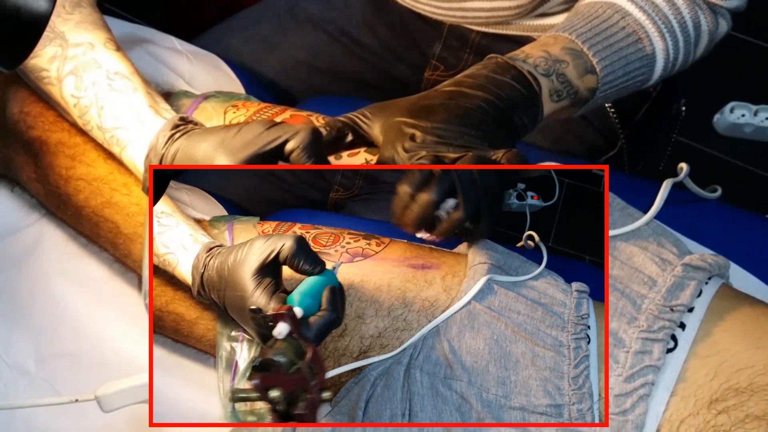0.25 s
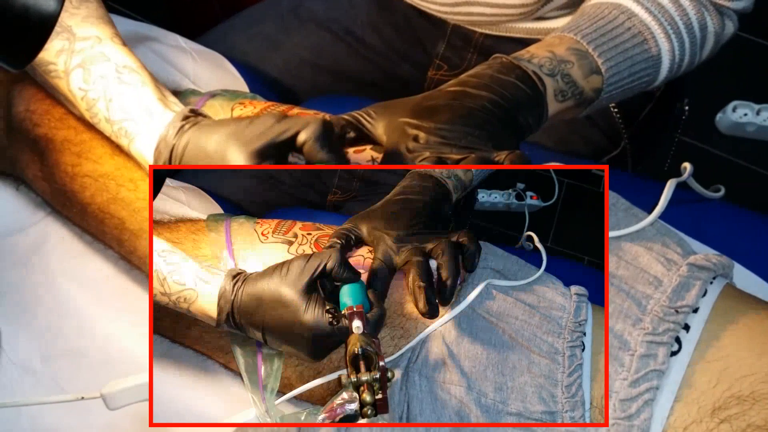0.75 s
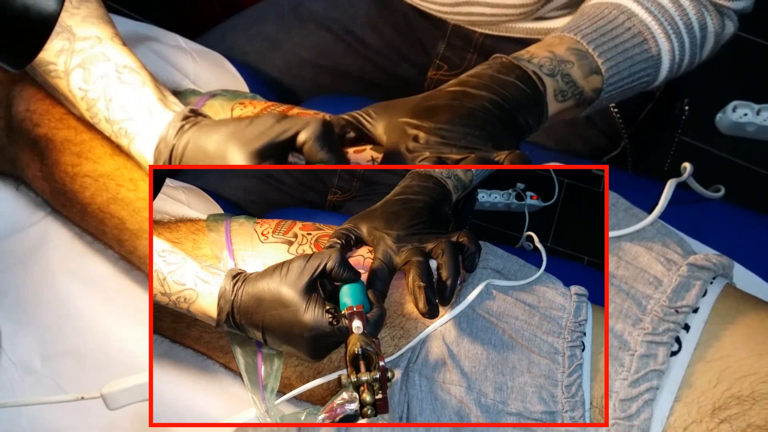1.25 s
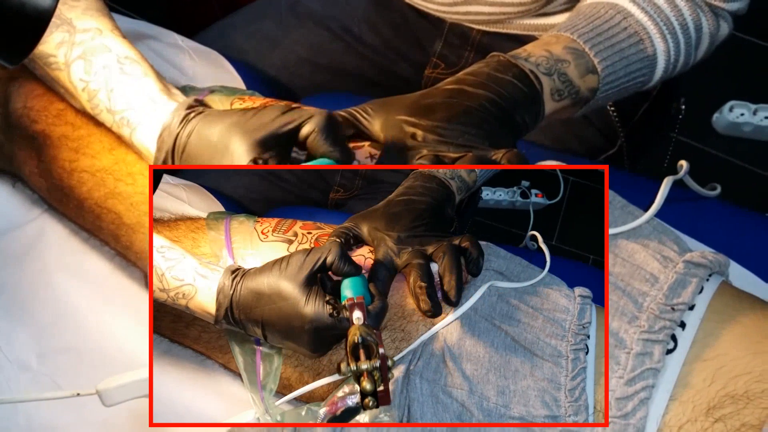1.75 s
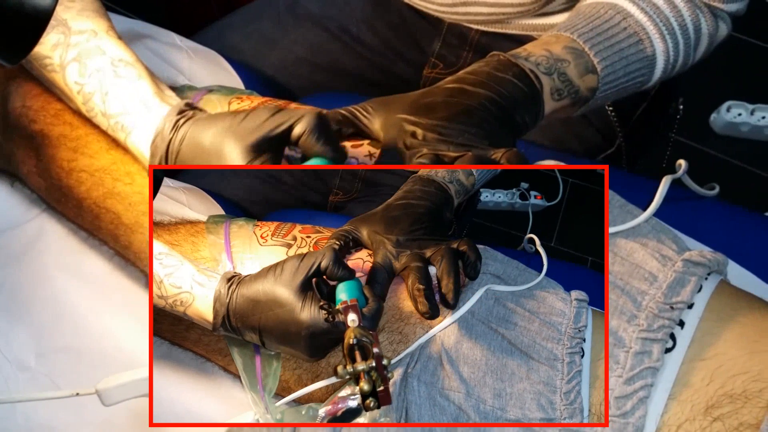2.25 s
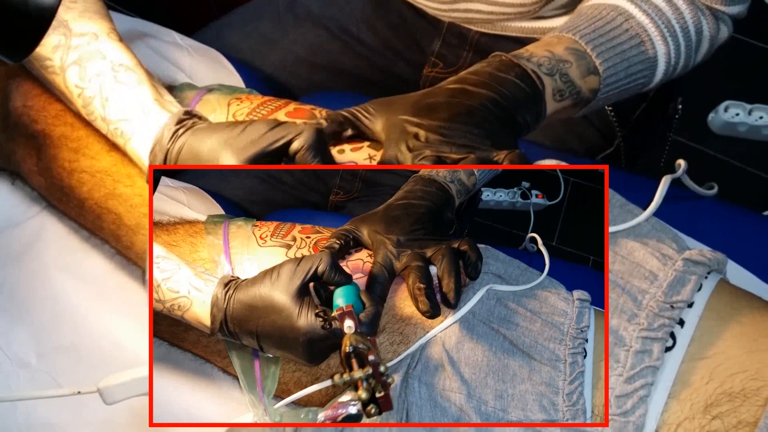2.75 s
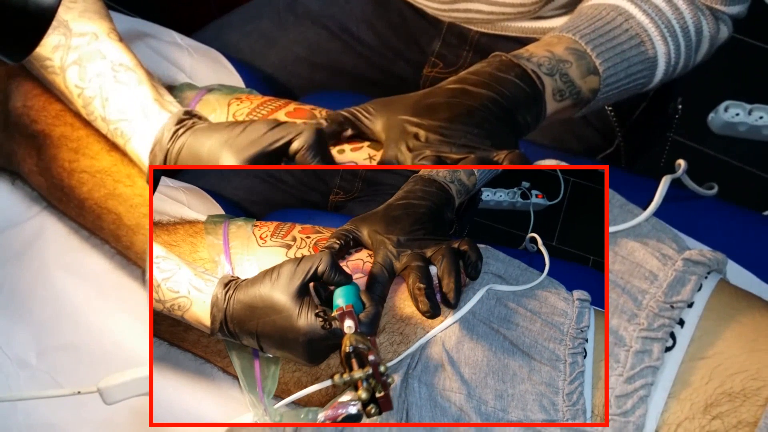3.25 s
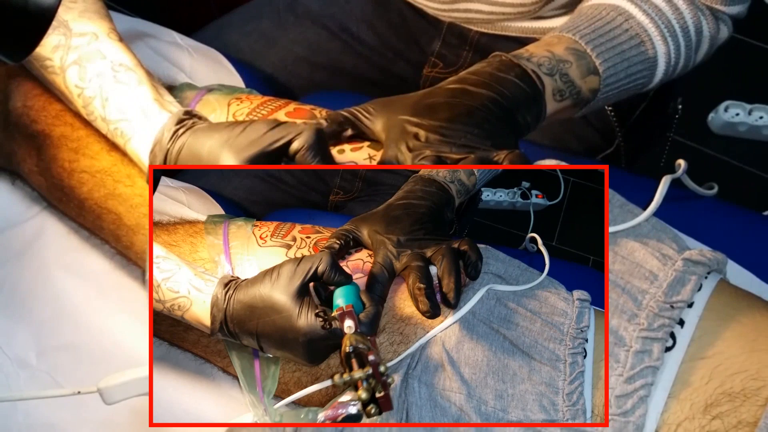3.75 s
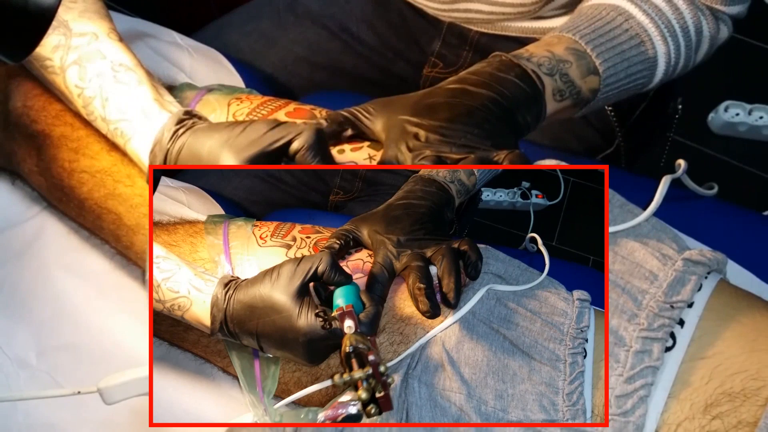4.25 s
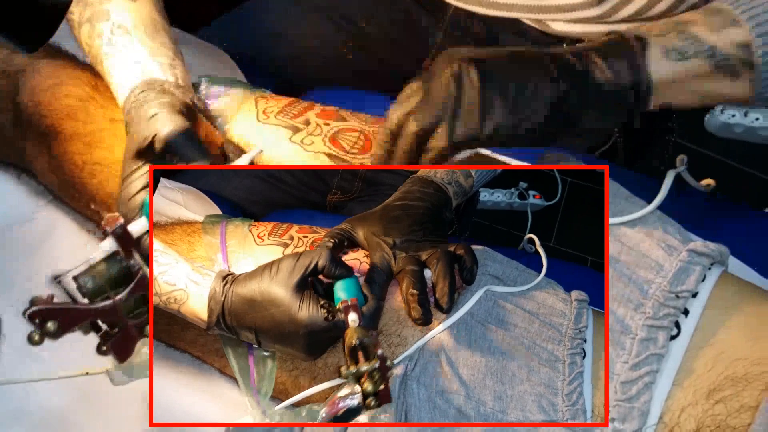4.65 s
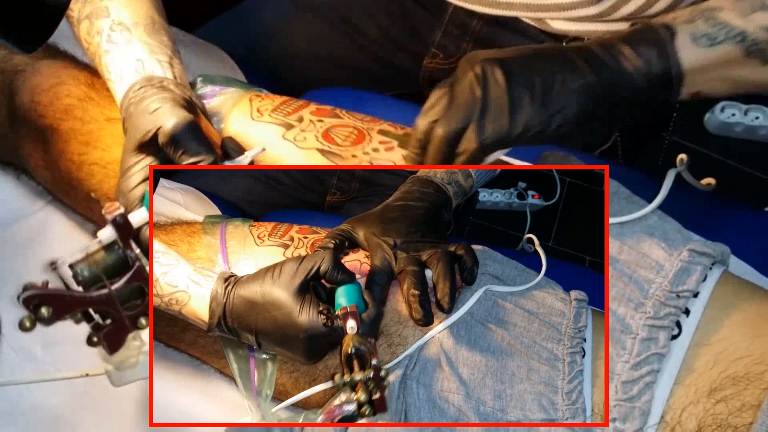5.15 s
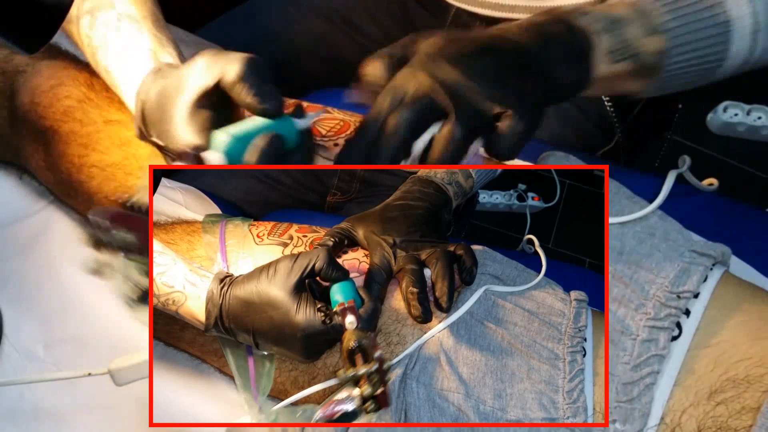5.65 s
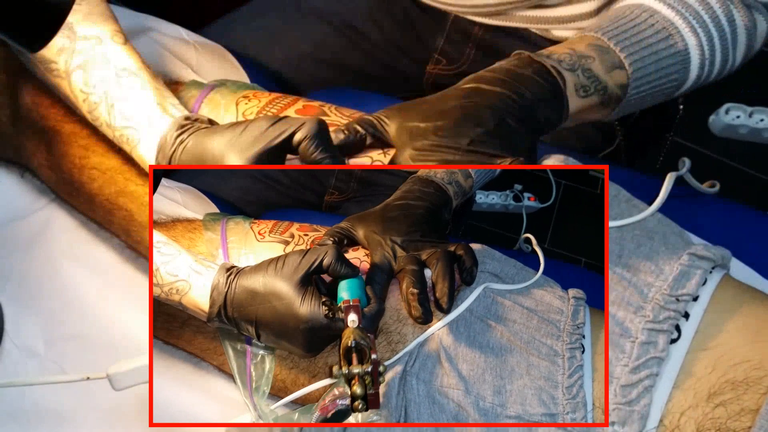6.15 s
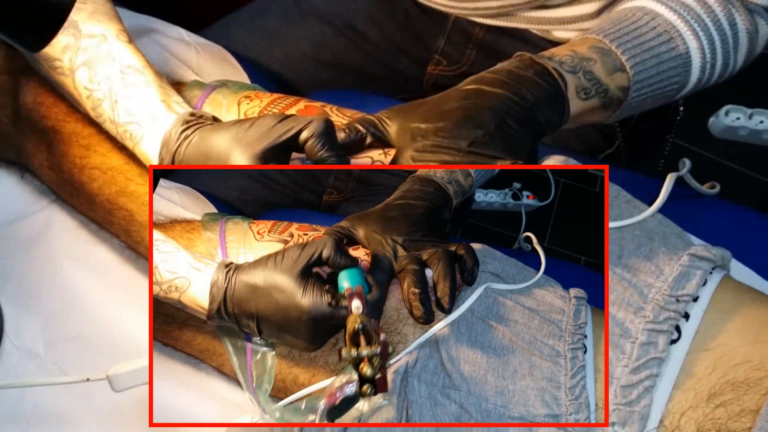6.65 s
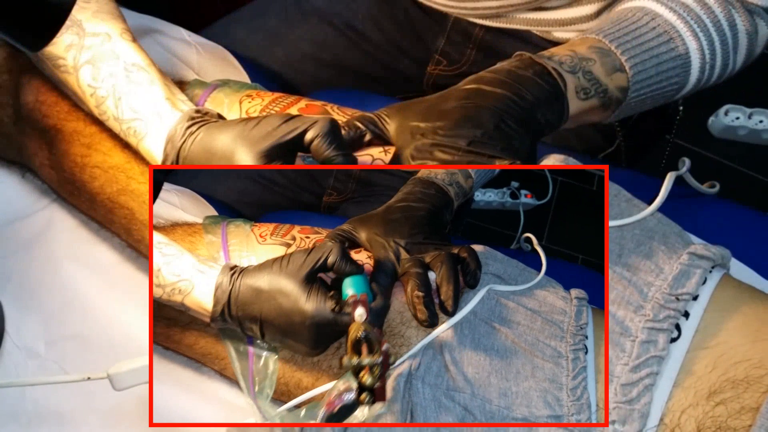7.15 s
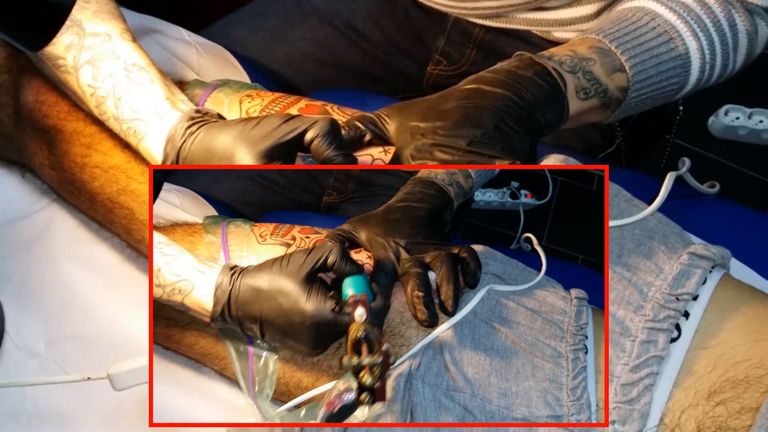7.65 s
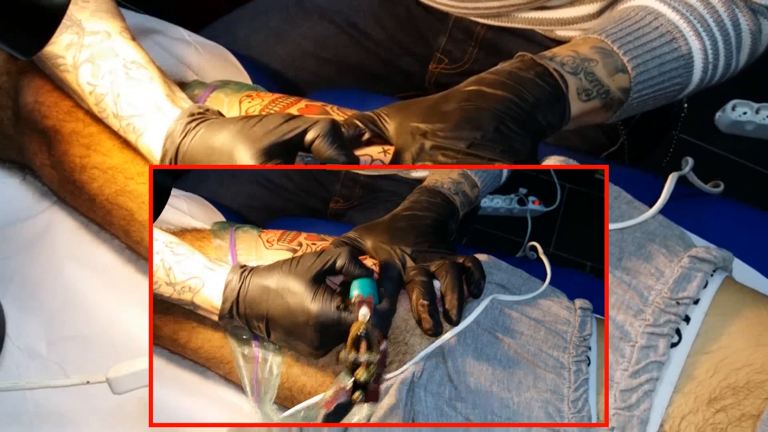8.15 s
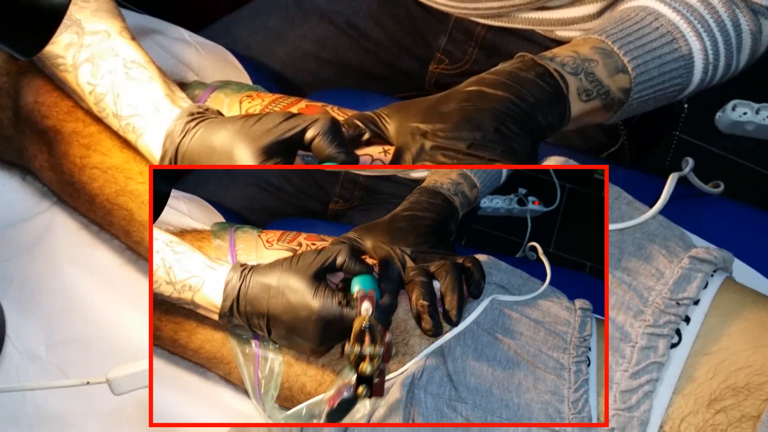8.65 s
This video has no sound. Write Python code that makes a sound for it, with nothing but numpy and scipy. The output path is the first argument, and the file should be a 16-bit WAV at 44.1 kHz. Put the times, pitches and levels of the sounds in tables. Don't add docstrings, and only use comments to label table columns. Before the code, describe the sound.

A coil tattoo machine buzzes without pause, thin, bright and metallic, with tiny ticks, low bumps and a brief pitch wobble as it lifts off near the end.

```python
import sys
import numpy as np
from scipy import signal
from scipy.fft import rfft, irfft, next_fast_len
from scipy.io import wavfile
from scipy.ndimage import uniform_filter1d

SR = 44100
rng = np.random.default_rng(int(sys.argv[2]) if len(sys.argv) > 2 else 0)


def dump_mix(stems):
    frames = np.atleast_2d(stems).T
    limited = np.clip(frames, -1, 1)
    pcm = np.round(limited * 32767).astype(np.int16)
    wavfile.write(sys.argv[1], SR, pcm)


def natural_amplitude(level_db):
    exponent = np.asarray(level_db, float) / 20
    return 10 ** exponent


N = 393372
WALL = round(.006984 * SR)
BLOCK, FIRST = 128, 87
CELL_HZ = SR / (2 * BLOCK)
LOW_CELLS = 26


def evened(x):
    return x / np.sqrt(np.mean(x ** 2) + 1e-20)


def follow(points, t):
    return np.interp(t, *np.transpose(points))


def read(points, hz):
    f, value = np.transpose(points)
    return np.interp(np.log(hz + 1), np.log(f + 1), value)


def band(x, lo_hz, hi_hz, edge_hz):
    size = next_fast_len(N)
    hz = np.fft.rfftfreq(size, 1 / SR)
    gain = np.clip(np.minimum(hz - lo_hz, hi_hz - hz) / edge_hz + .5, 0, 1)
    return evened(irfft(rfft(x, size) * gain, size)[..., :N])


def resonate(x, hz, width_hz):
    turn = np.exp(2j * np.pi * np.cumsum(hz * np.ones(N)) / SR)
    r = np.exp(-np.pi * width_hz / SR)
    return 2 * (turn * signal.lfilter([1 - r], [1, -r], x / turn)).real


def cells():
    n, k = np.arange(2 * BLOCK)[:, None] + .5, np.arange(BLOCK) + .5
    window = np.sin(np.pi * n / (2 * BLOCK))
    return window * np.cos(np.pi / BLOCK * (n + BLOCK / 2) * k) * np.sqrt(2 / BLOCK)


# time_s, slap_level_db
EFFORT = [(0, -17.5), (.4, -22), (.9, -19.5), (1.5, -19), (2.1, -15.5), (2.6, -15.5), (3.2, -17),
          (3.6, -15.5), (3.9, -19), (4.6, -19.5), (5.3, -20.5), (5.8, -20), (6.4, -18.5), (6.9, -17),
          (7.6, -16), (8.2, -16), (8.5, -15), (8.92, -17)]
# center_s, length_s, change_db
JOLTS = [(0.816, 0.044, -10.5), (1.176, 0.081, -6.5), (2.205, 0.054, -3.9), (2.296, 0.14, 0.5),
         (2.381, 0.11, -6.5), (2.865, 0.09, -4.5), (2.969, 0.049, 2.5), (3.137, 0.019, 7.5),
         (3.242, 0.014, 4.5), (3.302, 0.094, -5), (3.71, 0.12, -9.5), (4.263, 0.081, -1.5),
         (4.37, 0.086, 3.5), (4.522, 0.042, 3.5), (4.891, 0.079, 3), (4.965, 0.06, -4),
         (5.125, 0.029, -3.8), (5.812, 0.064, -9), (6.202, 0.09, -8), (6.253, 0.055, 4.5),
         (6.391, 0.13, -5.6), (6.488, 0.043, 6.5), (6.866, 0.045, -9.5), (7.053, 0.04, -8),
         (7.273, 0.12, -3.5), (7.483, 0.037, -5.5), (8.172, 0.057, -4), (8.317, 0.077, -7),
         (8.709, 0.074, -5.5), (8.874, 0.074, 6)]
# time_s, share
TURN = [
    (0, 0.13),
    (6.1, 0.07),
    (6.6, .3),
    (7.9, 0.2),
    (8.3, .5),
    (8.58, 0.64),
    (8.62, 2.6),
    (8.67, 2.5),
    (8.69, 1),
    (8.92, 0.72),
]


def controls(t):
    level_db = follow(EFFORT, t)
    level_db = level_db + sum(db * np.exp(-8 * ((t - s) / length) ** 2) for s, length, db in JOLTS)
    over_db, turn = level_db + 18, follow(TURN, t)
    steps, flutter_s = rng.standard_normal((300, 4)), .04
    shake, ring, shoulder, bright = (np.interp(t, np.arange(len(steps)) * flutter_s, c) for c in steps.T)
    ring_db = -6 + 1.08 * over_db - 4 * np.clip(2 * turn - 1, 0, 1) + 2 * ring
    shoulder_db = -9.5 - .44 * over_db + 4 * np.clip(2 * turn - .8, 0, 1) + shoulder
    bright_db = -8 - .88 * over_db - 4.5 * turn + 1.06 * bright
    return level_db + .13 * shake, ring_db, shoulder_db, bright_db


# time_s, lead_strokes
LEAD = [(0, -.345), (.8, .64), (1, .733), (1.4, 1.025), (2, 1.177), (2.5, 1.04), (3, .977), (3.5, .72),
        (3.8, .685), (4.6, .663), (5, .585), (5.4, .623), (5.8, 1), (6.6, .95), (7.4, 1.354), (8, 1.85),
        (8.4, 2.115), (8.92, 2.81)]


def slaps(t):
    strokes_per_s = 75.7
    strokes = strokes_per_s * t + follow(LEAD, t) + 1.21
    chance = rng.standard_normal((int(strokes[-1]) + 1, 2))[strokes.astype(int)]
    late_s = .00033 * abs(chance[:, 0])
    since_s = np.maximum(strokes % 1 / strokes_per_s - late_s, 0)
    slap = evened((since_s / .0016) ** 3 * np.exp(-since_s / .0008) * natural_amplitude(.6 * chance[:, 1]))
    habit = rng.standard_normal(SR)[(since_s * SR).astype(int)]
    fresh, rebound, chatter = rng.standard_normal((3, N))
    drive = slap * (.41 * habit + .98 * fresh)
    drive = drive + natural_amplitude(-11.5) * np.roll(slap, 290) * rebound
    drive = drive + natural_amplitude(-5) * uniform_filter1d(chatter, size=4)
    drive = drive + natural_amplitude(-6.5) * uniform_filter1d(np.roll(drive, WALL), size=2)
    return slap, drive


# pitch_hz, width_hz, level_db
FRAME = [(4870, 150, -8), (5450, 150, -10), (6450, 120, -8), (7010, 120, -8), (8030, 150, -12),
         (10000, 250, -12), (11500, 250, -10), (12500, 300, -12)]
# time_s, pitch_hz
RING_HZ = [
    (0, 7300),
    (8.29, 7300),
    (8.364, 6800),
    (8.5, 6850),
    (8.6, 7500),
    (8.734, 7800),
    (8.82, 7330),
    (8.92, 7390),
]


def frame_ring(drive, ring_db, t):
    grip = rng.standard_normal((N // 256 + 1, len(FRAME)))
    grip = evened(uniform_filter1d(grip, size=14, axis=0))
    grip_db = [np.interp(t, np.arange(len(g)) * 256 / SR, 3 * g) for g in grip.T]
    main_hz = RING_HZ[0][1]
    bend = follow(RING_HZ, t) / main_hz
    detune = .006 / 3
    body = drive
    for (hz, width_hz, db), g in zip(FRAME, grip_db):
        mode = resonate(drive, hz * bend * (1 + detune * g[::-1]), width_hz)
        body = body + natural_amplitude(6 + db + g) * mode
    main = resonate(drive, main_hz * bend * (1 + detune * grip_db[0]), 190)
    return body + natural_amplitude(7.5 + 1.5 * (np.maximum(ring_db, -8) + 5)) * main


# pitch_hz, density_db
RATTLE = [(1760, -64), (3000, -36.5), (3510, -28.5), (4250, -21.5), (4820, -7), (5200, -13), (5540, -7),
          (6130, -7), (7190, -1), (7560, -1), (9350, -23), (10700, -13.5), (11600, -9), (12800, -14),
          (13600, -24)]


def rattle(body, slap, shoulder_db, bright_db):
    size = next_fast_len(N)
    shaped = irfft(rfft(body, size) * natural_amplitude(.7 * read(RATTLE, np.fft.rfftfreq(size, 1 / SR))), size)[:N]
    low = band(shaped, 3900, 8000, 500)
    low = low / np.sqrt(uniform_filter1d(low ** 2, size=1750))
    beat = evened(3.5 + uniform_filter1d(slap + .83 * np.roll(slap, WALL), size=80))
    shoulder = natural_amplitude(np.maximum(shoulder_db, -15) + .45) * band(shaped, 7966, 10200, 220)
    bright = natural_amplitude(np.maximum(bright_db, -30) - .16) * beat * band(shaped, 10200, 13600, 300)
    return low + shoulder + bright


def hand_shade(buzz):
    hz, frames_s, z = signal.stft(buzz, SR, nperseg=256)
    shade = rng.standard_normal(z.T.shape)
    shade = uniform_filter1d(uniform_filter1d(shade, size=9, axis=0), size=4, axis=1).T
    top = 10 * np.clip(hz / 12400 - 1, 0, .1)[:, None]
    z = z * natural_amplitude(-14 * top * np.minimum(follow(TURN, frames_s), 1))
    z = z * natural_amplitude(2.8 * evened(shade - shade[22:47].mean(0)))
    return signal.istft(z, SR, nperseg=256)[1][:N]


def machine():
    t = np.arange(N) / SR
    slap, drive = slaps(t)
    level_db, ring_db, shoulder_db, bright_db = controls(t)
    body = frame_ring(drive, ring_db, t)
    buzz = rattle(body, slap, shoulder_db, bright_db)
    return natural_amplitude(level_db + .5) * hand_shade(buzz)


# pitch_hz, step_db
STEP = [(3300, -11.5), (7000, -11), (9500, -10.5), (13500, -11)]
# start_s, end_s
SMEARED = [
    (2.288, 2.334),
    (8.163, 8.21),
    (8.511, 8.558),
    (8.743, 8.79),
]


def starve(x):
    basis, count = cells(), N // BLOCK + 2
    padded = np.pad(x, (BLOCK - FIRST, 3 * BLOCK))
    at = np.arange(count)[:, None] * BLOCK + np.arange(2 * BLOCK)
    cell = padded[at] @ basis
    hz, t = (np.arange(BLOCK) + .5) * CELL_HZ, (at[:, 0] + FIRST) / SR
    groups = count // 8 + 1
    budget_db = 1.8 * np.repeat(rng.standard_normal(groups), 8)[:count, None]
    band_db = 1.8 * np.kron(rng.standard_normal((groups, 32)), np.ones((8, 4)))[:count]
    loud_db = 10 * np.log10(uniform_filter1d((cell ** 2).mean(1), size=12) + 1e-9)[:, None]
    step = natural_amplitude(read(STEP, hz) + budget_db + band_db + .7 * (loud_db + 17))
    rounded = np.sign(cell) * step * np.floor((abs(cell) / step) ** .75 + .36) ** (4 / 3)
    rounded = np.array([rounded, rounded])
    for start_s, end_s in SMEARED:
        inside = (t > start_s) & (t < end_s)
        fill_gain = natural_amplitude(-19 - np.maximum(hz - 12000, 0) / 150) * (hz < 14600)
        fill = fill_gain * rng.standard_normal(rounded[:, inside].shape)
        rounded[:, inside] = np.where(hz > 8800, fill, cell[inside] * (hz > 3700))
    halves = rounded @ basis.T
    joined = halves[..., :BLOCK] + np.roll(halves[..., BLOCK:], 1, 1)
    return joined.reshape(2, -1)[:, BLOCK - FIRST:][:, :N]


def gate(length, chance):
    return np.repeat(rng.random(N // length + 1) < chance, length)[:N]


def top_fizz(buzz):
    frame_s = np.arange(N // 1024 + 1) * 1024 / SR
    opened = gate(1024, .74 - .25 * follow(TURN, frame_s)) * gate(256, .7) * gate(4096, .8)
    envelope = uniform_filter1d(abs(buzz) * opened, size=200)
    return natural_amplitude(-56.5) * band(envelope * rng.standard_normal((2, N)), 13700, 15850, 100)


def play_cells(events):
    out, basis = np.zeros(N + 2 * BLOCK), cells()[:, :LOW_CELLS]
    for s, db, gains in events:
        start = FIRST + BLOCK * (round((s * SR - FIRST) / BLOCK) - 1)
        signs = rng.choice([-1, 1], LOW_CELLS)
        out[start:start + 2 * BLOCK] += natural_amplitude(db + 1.5) * basis @ (gains * signs)
    return out[:N]


def one_cell(hz):
    return (np.arange(LOW_CELLS) == int(hz / CELL_HZ)).astype(float)


EDGE_BLIPS_S = [.121, .8611, 1.1368, 1.1485, 1.19, 1.3458, 1.37, 3.476, 6.1407, 6.393, 6.512, 7.026, 7.2872]


def edge_blips():
    return play_cells([(s, -11, one_cell(3700)) for s in EDGE_BLIPS_S])


# start_s, level_db, pitch_hz
TICKS = [(.1326, -18, 2842), (.8495, -14, 3186), (1.0846, -17, 2497), (1.3981, -15, 3186),
         (1.5026, -17, 2670), (1.5954, -12, 2842), (1.8073, -5, 3014), (1.9263, -9, 3359),
         (2.0831, -17, 2670), (2.4139, -11, 3186), (2.8261, -11, 2842), (2.8406, -11, 2670),
         (3.1047, -20, 3186), (3.1309, -7, 3186), (3.2499, -14, 2497), (3.6359, -9, 3186),
         (3.6881, -11, 2842), (4.4283, -20, 2670), (5.4325, -15, 3014), (5.537, -14, 2670),
         (5.5893, -16, 3014), (5.6676, -15, 3014), (5.746, -18, 2497), (5.7983, -17, 2670),
         (5.8505, -15, 3014), (6.1291, -14, 3359), (6.4716, -18, 3186), (6.6574, -18, 1292),
         (6.8141, -12, 3014), (8.097, -9, 3186)]


def needle_ticks():
    return play_cells([(s, db, one_cell(hz)) for s, db, hz in TICKS])


# start_s, cell_level_db, low_pitch_hz, high_pitch_hz, share_of_cells_above
KNOCKS = [(.3416, -20, 258, 2670, .2), (1.6883, -23, 86, 2325, .37), (1.9902, -17, 1464, 2670, .2),
          (2.919, -18, 86, 258, .11), (3.0119, -22, 258, 602, .08), (3.1976, -20, 86, 258, .26),
          (3.2905, -19, 86, 430, .08), (3.3427, -21, 86, 1292, .32), (3.3834, -18, 86, 430, .47),
          (3.662, -20, 86, 947, .32), (4.0451, -17, 86, 947, .21), (4.1496, -23, 258, 2842, .05),
          (4.8114, -24, 86, 602, 0), (5.2874, -21, 1119, 1292, .2), (5.6938, -21, 1464, 1636, 0),
          (6.222, -18, 775, 1119, .03), (6.3788, -24, 1464, 3014, .05), (6.5645, -20, 86, 1981, .05),
          (6.8664, -23, 258, 1119, .1), (6.9593, -24, 2670, 3359, 0), (7.3772, -25, 258, 1636, 0),
          (7.4701, -21, 86, 2497, .63), (8.8401, -25, 1464, 1981, 0)]


def hand_knocks():
    index, events = np.arange(LOW_CELLS), []
    for s, db, low_hz, high_hz, share in KNOCKS:
        lucky = rng.random(LOW_CELLS) < 1.9 * share
        gains = natural_amplitude(-5) * lucky * (index >= low_hz // CELL_HZ) * (index * CELL_HZ < 3900)
        gains[[int(low_hz / CELL_HZ), int(high_hz / CELL_HZ)]] = 1
        events.append((s, db, gains))
    return play_cells(events)


# start_s, peak_level_db, pitch_hz
PINGS = [(0.4963, -26, 4080), (0.6384, -23, 4000), (1.5703, -26, 3680), (1.6866, -32, 4280),
         (1.7789, -28, 4210), (1.8063, -26, 4080), (1.9764, -25, 4100), (2.0697, -27, 3710),
         (2.4139, -21, 3810), (2.825, -23, 3980), (3.1288, -26, 4050), (3.2889, -29, 4080),
         (3.8317, -24, 4240), (3.9644, -23, 3900), (4.0447, -26, 3710), (4.136, -28, 4030),
         (4.4124, -29, 4290), (4.4817, -30, 3990), (4.5456, -27, 4260), (4.8589, -27, 3700),
         (5.9554, -25, 4190), (6.113, -24, 3920), (6.551, -25, 3890), (6.76, -24, 4280),
         (7.3257, -27, 3700), (7.4704, -24, 4160), (7.639, -24, 4050), (7.7034, -26, 4290),
         (7.8077, -24, 3890), (8.3968, -26, 4050)]


def edge_pings():
    return play_cells([(s + BLOCK / SR, db + 20, one_cell(hz)) for s, db, hz in PINGS])


# start_s, level_db
OVERLOADS = [
    (2.018, -16),
    (2.7867, -28.5),
    (2.973, -9.5),
    (6.4729, -23),
    (7.785, -19),
    (8.3991, -24.5),
    (8.7222, -24.5),
    (8.9185, -15),
]


def overloads():
    out = np.zeros(N)
    for s, db in OVERLOADS:
        out[round(s * SR)] = natural_amplitude(db)
    return out


# start_s, level_db
THUDS = [
    (2.1237, -17),
    (4.9449, -11),
    (5.7054, -28),
    (6.5239, -24),
    (6.8519, -11),
]


def wrist_thuds():
    return play_cells([(s, db, one_cell(86)) for s, db in THUDS])


# start_s, length_s, level_db, low_hz, high_hz
CLINKS = [
    (3.186, .007, -12, 2153, 2497),
    (4.8549, .01, -11, 1808, 2153),
    (6.5471, .007, -9, 1808, 2153),
    (6.6284, .007, -12, 2153, 2497),
]


def grip_clinks():
    events = []
    for s, length_s, db, low_hz, high_hz in CLINKS:
        for hz in np.arange(low_hz, high_hz + 1, CELL_HZ):
            for late_s in np.arange(0, length_s, BLOCK / SR):
                events.append((s + late_s, db, one_cell(hz)))
    return play_cells(events)


# pitch_hz, level_db
SQUEAK = [(2950, -38), (3600, -36)]


def squeak():
    start_s, length_s = 8.532, .029
    t = np.arange(round(length_s * SR)) / SR
    tone = sum(natural_amplitude(db) * np.sin(2 * np.pi * hz * t) for hz, db in SQUEAK)
    out = np.zeros(N)
    out[round(start_s * SR):][:len(t)] = tone * signal.windows.tukey(len(t), .3)
    return out


def scene():
    return np.tile(machine(), (2, 1))


def roll_off(x):
    return signal.sosfilt(signal.butter(12, 15850, fs=SR, output="sos"), x)


def record(dry):
    limited = .68 * np.tanh(dry.mean(0) / .76) * natural_amplitude(1.19)
    buzz = starve(limited) + edge_blips() + needle_ticks() + hand_knocks() + edge_pings()
    buzz = buzz + wrist_thuds() + grip_clinks() + squeak()
    mix = np.clip(buzz + overloads() + top_fizz(buzz[0]), -1, 1)
    return roll_off(mix + natural_amplitude(-100) * rng.standard_normal(N))


dry = scene()
out = record(dry)
dump_mix(out)
```